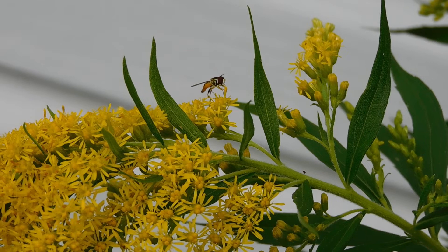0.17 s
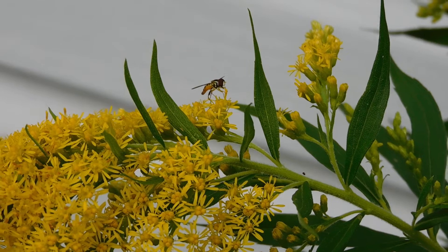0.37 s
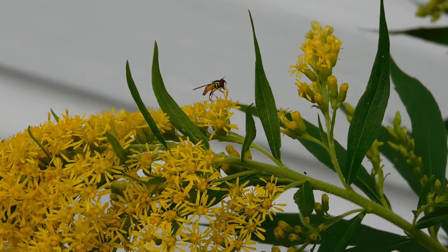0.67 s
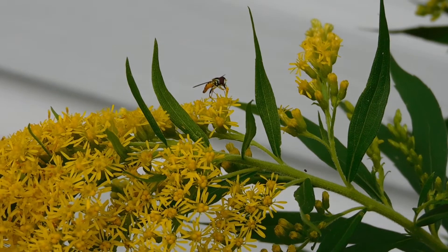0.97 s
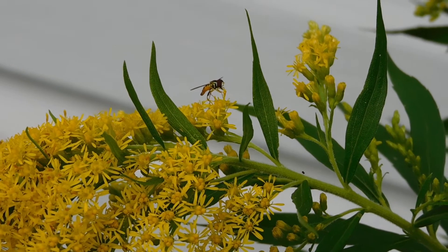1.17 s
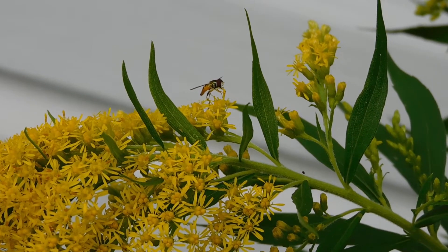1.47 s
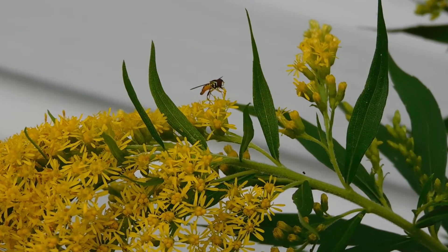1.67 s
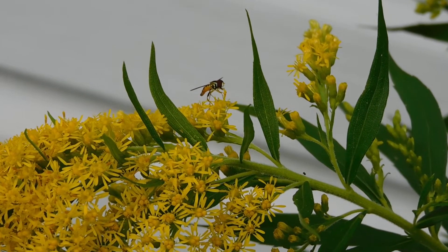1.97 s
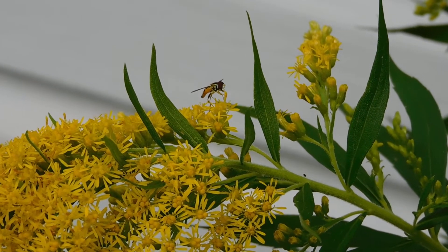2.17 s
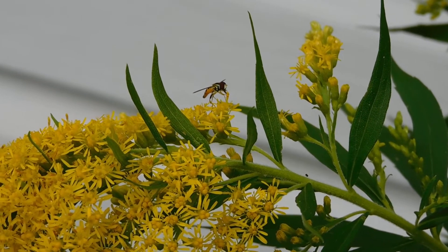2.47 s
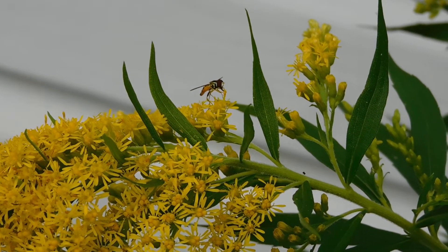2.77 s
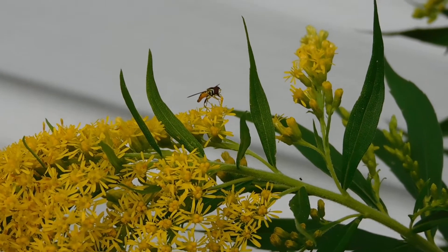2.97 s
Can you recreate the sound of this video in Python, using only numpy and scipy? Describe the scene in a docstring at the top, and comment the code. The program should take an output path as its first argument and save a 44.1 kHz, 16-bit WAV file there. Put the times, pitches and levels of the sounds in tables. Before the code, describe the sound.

Crickets chirp in quick pulsing groups over a dense insect shimmer and faint distant engine rumble.

```python
"""A garden by a house wall, full of crickets. One near field cricket gives four-syllable chirps and its wall echo;
its neighbours answer, mostly lower, and a far chorus, trilling ground crickets and a faint tree cricket fill the gaps.
A distant engine revs up and down and a car draws nearer under soft traffic noise and microphone hiss.
Insects are swelling tones that fall in pitch, the engine is a firing tone with two overtones,
and the haze, traffic and road are coloured noise."""
import sys
import numpy as np
from scipy import signal
from scipy.fft import rfft, irfft
from scipy.io import wavfile
from scipy.ndimage import uniform_filter1d

SR = 44100
rng = np.random.default_rng(int(sys.argv[2]) if len(sys.argv) > 2 else 0)


def unload_wav(signal):
    """Save mono or channel-first audio to the path in sys.argv[1] as 16-bit WAV at rate SR, clipped to [-1, 1]."""
    wavfile.write(
        sys.argv[1],
        SR,
        np.round(np.clip(np.atleast_2d(signal).T, -1, 1) * 32767).astype(np.int16),
    )


N = 137151  # length in samples


def undb(db):
    """Logarithmic level: decibels to amplitude gain."""
    return 10 ** (np.asarray(db) / 20)


def level(x, db):
    """Effective value: scale a signal to an rms level in dB."""
    return x * undb(db) / np.sqrt(np.mean(x ** 2))


def pan(db):
    """Interaural level difference: channel gains for a left minus right level in dB."""
    return undb(np.array([[db], [-db]]) / 2)


def clock():
    """Sampling: the time of every sample in seconds."""
    return np.arange(N) / SR


def walk(rate):
    """Slow random modulation: held noise, `rate` values a second, smoothed twice to a spread near 1."""
    hold = max(int(SR / rate), 1)
    steps = np.repeat(rng.standard_normal(N // hold + 1), hold)
    smooth = uniform_filter1d(uniform_filter1d(steps, hold), hold)
    return 1.3 * smooth[:N]


def tone(hz):
    """Frequency modulation: the phase of a sine is the running sum of its pitch curve."""
    return np.sin(2 * np.pi * np.cumsum(hz) / SR)


def over_hz(points):
    """Spectral envelope: a table read at every frequency, on a log axis."""
    hz, value = np.array(points).T
    bins_hz = np.arange(N // 2 + 1) * SR / N
    return np.interp(np.log(bins_hz + 1e-9), np.log(hz), value)


# Likeness of left and right: (frequency [Hz], correlation [0-1])
LEFT_RIGHT_LIKENESS = [(50, 1), (130, 0.58), (600, 0.55), (1400, 0.23), (4000, 0.43), (10000, 0)]


def wide_noise(colour):
    """Interaural coherence: coloured noise whose mid and side shares set how alike the ears are at each frequency."""
    alike = np.clip(over_hz(LEFT_RIGHT_LIKENESS), 0, 1)
    mid, side = rfft(rng.standard_normal((2, N)))
    mid = mid * np.sqrt(1 + alike)
    side = side * np.sqrt(1 - alike) * np.array([[1], [-1]])
    return irfft((mid + side) * undb(over_hz(colour)), N)


GARDEN_T60_S = 0.21  # time for the scatter to fall by 60 dB


def garden(x, wet_db):
    """Reverberant decay: direct sound plus a short scatter from leaves and walls, different for each ear."""
    t = clock()[:SR // 2]
    tail = rng.standard_normal((2, len(t))) * np.exp(-np.log(1000) * t / GARDEN_T60_S)
    tail /= np.sqrt(np.sum(tail ** 2, axis=1, keepdims=True))
    scattered = signal.fftconvolve(x[None], tail, axes=1)[:, :N]
    return (x + undb(wet_db) * scattered) / np.hypot(1, undb(wet_db))


SAG_S, OCTAVE_DB = 0.0039, -28  # time constant of the pitch fall; octave relative to the tone
TOOTH_RATE, STROKE_ROUGH_DB = 300, 1.1  # roughness: random values per second, spread


def strokes(rows, swell_s, stop_s, sag_hz):
    """Stridulation: each (peak s, pitch Hz, dB) wing stroke is a tone that swells, falls in pitch and stops."""
    out = np.zeros(N)
    u = np.arange(-SR // 32, SR // 32) / SR  # time about the peak
    swell = np.exp(-np.abs(u / swell_s) ** 0.84)
    stop = np.exp(-(u / stop_s) ** 2)
    shape = np.where(u < 0, swell, stop)
    sag = -sag_hz * np.tanh(u / SAG_S)
    for peak_s, hz, db in rows:
        at = int(peak_s * SR) + np.arange(len(u)) - len(u) // 2
        inside = (at >= 0) & (at < N)
        # depth of the fall and pitch vary a little from stroke to stroke
        pitch = hz + sag * (1 + 0.152 * rng.standard_normal()) + 20 * rng.standard_normal()
        stroke = undb(db) * shape * (tone(pitch) + undb(OCTAVE_DB) * tone(2 * pitch))
        out[at[inside]] += stroke[inside]
    roughness = undb(STROKE_ROUGH_DB * walk(TOOTH_RATE))
    return out * np.sqrt(2) * roughness


TRILL_JITTER_S, STROKE_SCATTER_DB, TOOTH_DB = 0.0035, 1, 2  # spreads of timing, stroke strength and grain


def trill(hz, rate, sag_hz, rasp_hz, first_s=0, sharpness=2):
    """Amplitude and frequency modulation: an unbroken run of uneven strokes, each falling in pitch, grainy from file teeth."""
    turns = (clock() - first_s + TRILL_JITTER_S * walk(8)) * rate
    stroke = np.round(turns)
    phase = turns - stroke  # -0.5 to 0.5 within a stroke
    scatter_db = STROKE_SCATTER_DB * rng.standard_normal(N)[stroke.astype(int)]
    strength = undb(scatter_db + TOOTH_DB * walk(TOOTH_RATE))
    pulse = np.abs(np.cos(np.pi * phase)) ** sharpness
    return strength * pulse * tone(hz - sag_hz * phase + rasp_hz * walk(1100))


# Chirps of the near cricket: (first syllable [s], first gap [s], level before echo, scatter and pan [dB])
NEAR_CHIRPS = [(.616, 0.049, -41.5), (1.409, 0.048, -40.5), (2.103, .047, -40.5), (2.74, 0.046, -41)]
NEAR_HZ, NEAR_SAG_HZ, NEAR_PAN_DB, NEAR_WET_DB = 5170, 123.6, -6, -8
NEAR_SWELL_S, NEAR_STOP_S = .0054, .003
SLOWING_S, FIRST_SOFTER_DB = 0.0033, -0.5  # growth of each gap; the softening fades over the chirp
WALL_S, WALL_DB = .00649, -6  # delay and gain of the wall echo


def near_cricket(count=4):
    """Specular reflection: four strokes a chirp, the gaps widening; the wall returns them as one delayed copy."""
    rows = []
    for first_s, gap, db in NEAR_CHIRPS:
        for k in range(count):
            peak_s = first_s + k * gap + SLOWING_S * k * (k - 1) / 2
            rows.append((peak_s, NEAR_HZ, db + FIRST_SOFTER_DB / (1 + k) ** 2))
    song = strokes(rows, NEAR_SWELL_S, NEAR_STOP_S, NEAR_SAG_HZ)
    echo = np.interp(clock() - WALL_S, clock(), song)
    return garden(song + undb(WALL_DB) * echo, NEAR_WET_DB) * pan(NEAR_PAN_DB)


# Chirps of the neighbours:
# (first syllable [s], syllables [count], gap [s], pitch [Hz], level before scatter and pan [dB])
NEIGHBOUR_CHIRPS = [(.085, 4, 0.035, 5130, -50.5), (0.093, 4, 0.043, 4590, -49),
                    (.275, 3, 0.059, 4270, -55), (.372, 3, 0.045, 5140, -51), (.43, 4, 0.043, 4900, -47),
                    (.532, 4, .051, 4600, -48.5), (0.746, 3, 0.054, 4300, -52),
                    (.808, 4, 0.035, 5070, -48.5), (.905, 3, 0.038, 5190, -48),
                    (1.005, 4, 0.054, 4667, -51), (1.11, 2, 0.061, 4863, -46),
                    (1.225, 4, .045, 5090, -50.5), (1.226, 3, 0.058, 4300, -51),
                    (1.575, 4, 0.051, 4590, -48), (1.62, 3, 0.048, 5200, -49), (1.631, 3, 0.061, 4340, -50),
                    (1.675, 3, .062, 4850, -51.5), (1.784, 3, 0.051, 5180, -49.5),
                    (1.951, 3, .054, 4746, -49.5), (2.134, 3, .056, 4290, -51.5),
                    (2.146, 4, .05, 4690, -49), (2.44, 3, .044, 5054, -54), (2.525, 3, 0.049, 4780, -46),
                    (2.57, 3, 0.055, 4320, -51), (2.62, 3, 0.033, 5120, -49.5),
                    (2.718, 4, .049, 4730, -50.5), (2.92, 4, 0.06, 5034, -51),
                    (2.96, 3, 0.054, 4590, -48.5)]
NEIGHBOUR_SAG_HZ, NEIGHBOUR_SWELL_S, NEIGHBOUR_STOP_S = 149.4, 0.0092, 0.0046
NEIGHBOUR_PAN_DB, NEIGHBOUR_WET_DB = -2.5, 0.5


def neighbours():
    """Multipath scattering: crickets a few metres off, with a deeper sag; each chirp has its own scatter."""
    out = 0
    for first_s, syllables, gap, hz, db in NEIGHBOUR_CHIRPS:
        rows = [(first_s + k * gap, hz, db) for k in range(syllables)]
        song = strokes(rows, NEIGHBOUR_SWELL_S, NEIGHBOUR_STOP_S, NEIGHBOUR_SAG_HZ)
        out = out + garden(song, NEIGHBOUR_WET_DB)
    return out * pan(NEIGHBOUR_PAN_DB)


CHORUS_LOW_HZ, CHORUS_HIGH_HZ, CHORUS_DB, CHORUS_WET_DB = 4553, 5160, -57.5, -0.5
CHORUS_PERIOD_S, CHORUS_GAP_S = .42, .05  # middle values; each cricket has its own pace


def chorus(count=12, size=4):
    """Incoherent summation: far crickets, each with its own pitch, pace and scatter, add up."""
    out = 0
    pitches = np.linspace(CHORUS_LOW_HZ, CHORUS_HIGH_HZ, count)
    for hz, (lead, pace) in zip(pitches, rng.random((count, 2))):
        stretch = .85 + .3 * pace
        starts = (np.arange(count) - lead) * CHORUS_PERIOD_S * stretch
        rows = [(s + k * CHORUS_GAP_S * stretch, hz, 0) for s in starts for k in range(size)]
        song = strokes(rows, NEIGHBOUR_SWELL_S, NEIGHBOUR_STOP_S, NEIGHBOUR_SAG_HZ)
        out = out + garden(song, CHORUS_WET_DB)
    return level(out, CHORUS_DB) * pan(NEIGHBOUR_PAN_DB)


# Spectrum of the haze: (frequency [Hz], relative density [dB])
HAZE_SPECTRUM = [(3900, -29), (4300, -0.5), (4700, -15.5), (5100, -0.5), (5500, -4), (5850, -2.5),
                 (6250, 1), (6950, 6.5), (7400, -3.5), (8000, -10), (8600, -36)]
HAZE_DB = -54


def haze():
    """Statistical limit of many sources: the farthest crickets merge into band-shaped noise."""
    return level(wide_noise(HAZE_SPECTRUM), HAZE_DB) * pan(NEIGHBOUR_PAN_DB)


# Ground crickets: (pitch [Hz], stroke rate [1/s], first stroke [s], level before scatter and pan [dB])
GROUND_TRILLS = [(6970, 11, 0.0297, -60), (6900, 11.93, 0.0652, -61), (6510, 11, 0.0377, -63.5),
                 (6495, 11.85, 0.0626, -64), (6390, 24.05, 0.0257, -66), (7000, 25.8, 0.0273, -62)]
TRILL_SAG_HZ, TRILL_RASP_HZ, TRILL_SHARPNESS = 297, 168.7, 2.9
TRILL_WET_DB, TRILL_PAN_DB = -1, -2.5


def ground_crickets():
    """Beating of pulse rates: trills of unequal rate move in and out of step."""
    out = 0
    for hz, rate, first_s, db in GROUND_TRILLS:
        song = trill(hz, rate, TRILL_SAG_HZ, TRILL_RASP_HZ, first_s, TRILL_SHARPNESS)
        out = out + garden(level(song, db), TRILL_WET_DB)
    return out * pan(TRILL_PAN_DB)


def tree_cricket():
    """Reverberant masking: a far low trill whose scatter outweighs its direct sound."""
    song = trill(hz=2648, rate=29, sag_hz=120, rasp_hz=110.1)
    return garden(level(song, -73.8), wet_db=3.0) * pan(TRILL_PAN_DB)


# Thin high trills: (start [s], end [s])
THIN_TRILLS = [(.07, 0.16), (1.83, 1.98), (2.38, 2.68)]


def thin_trills():
    """Gating: a continuous high trill is heard only now and then, with softened edges."""
    t = clock()
    sings = uniform_filter1d(sum(1. * (t > start) * (t < end) for start, end in THIN_TRILLS), size=1000)
    song = level(trill(hz=8180, rate=80, sag_hz=59.8, rasp_hz=50), -70.5)
    return garden(sings * song, TRILL_WET_DB) * pan(TRILL_PAN_DB)


# Distant engine: (time [s], firing rate [Hz], level of the firing tone before pan [dB])
ENGINE_REVS = [(.1, 42.9, -68), (.6, 44, -56.5), (1.2, 45.9, -57), (1.331, 50.14, -49), (1.44, 59, -46.5),
               (1.542, 66.46, -44), (1.692, 72.2, -45), (1.93, 77, -48.5), (2.049, 75.1, -50),
               (2.149, 72, -46.5), (2.42, 52.47, -49.5), (2.6, 48.9, -48.5), (2.78, 51.7, -44.5),
               (3.1, 56.2, -48.5)]
# Overtones 2 and 3 of the firing tone: (level relative to it [dB])
ENGINE_OVERTONES = [-29, -29]
LOW_PAN_DB = -1  # shared by engine, air and car


def engine():
    """Harmonic series: almost only the firing tone of a far exhaust arrives, rising and falling with the throttle."""
    s, hz, db = np.array(ENGINE_REVS).T
    hz = uniform_filter1d(np.interp(clock(), s, hz), size=4000)
    hum = tone(hz)
    for k, overtone_db in enumerate(ENGINE_OVERTONES, 2):
        hum = hum + undb(overtone_db) * tone(k * hz)
    return np.sqrt(2) * hum * undb(np.interp(clock(), s, db)) * pan(LOW_PAN_DB)


# Level of the nearing car: (time [s], level before waver and pan [dB])
CAR_LEVEL = [(0, -80), (2.0, -70.5), (2.45, -63), (2.85, -55.5), (3.1, -59)]
# Spectrum of its road noise: (frequency [Hz], relative density [dB])
ROAD_SPECTRUM = [(100, -22), (150, -22), (200, -6), (290, 7), (380, -2.5), (500, -9.5), (700, -12.5),
                 (1050, -4.5), (1600, -30), (3000, -33)]
CAR_WAVER_DB = 0.4


def car():
    """Level change with distance: the road noise of a car slowly draws nearer, then eases at the end."""
    s, db = np.array(CAR_LEVEL).T
    loudness_db = np.interp(clock(), s, db) + CAR_WAVER_DB * walk(9)
    return level(wide_noise(ROAD_SPECTRUM), 0) * undb(loudness_db) * pan(LOW_PAN_DB)


# Spectrum of steady traffic and hiss: (frequency [Hz], relative density [dB])
AIR_SPECTRUM = [(20, -69.5), (40, -62.5), (90, -62.5), (180, -74), (260, -74), (400, -76.5), (600, -74.5),
                (900, -80.5), (1400, -87.5), (2100, -91), (3400, -90.5), (8500, -90), (15500, -91.5)]
AIR_DB, AIR_WAVER_DB = -52, 0.4


def town_air():
    """Broadband noise floor: steady traffic and microphone hiss, wavering slightly in level."""
    return level(wide_noise(AIR_SPECTRUM), AIR_DB) * undb(AIR_WAVER_DB * walk(5.2)) * pan(LOW_PAN_DB)


def scene():
    """Superposition: insects over the distant road."""
    field_crickets = near_cricket() + neighbours() + chorus() + haze()
    trillers = ground_crickets() + tree_cricket() + thin_trills()
    road = engine() + car() + town_air()
    return field_crickets + trillers + road


START_S, FADE_S, TOP_HZ = .072, 0.015, 15750


def record(dry):
    """Band limiting: the sound fades in after a short silence and a steep low-pass cuts the top."""
    opened = dry * np.clip((clock() - START_S) / FADE_S, 0, 1)
    low_pass = signal.ellip(10, .1, 70, TOP_HZ, fs=SR, output="sos")  # 0.1 dB ripple, 70 dB stop band
    return signal.sosfilt(low_pass, opened)


dry = scene()
out = record(dry)
unload_wav(out)
```